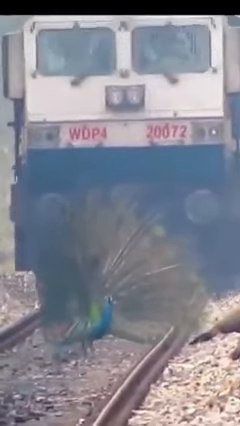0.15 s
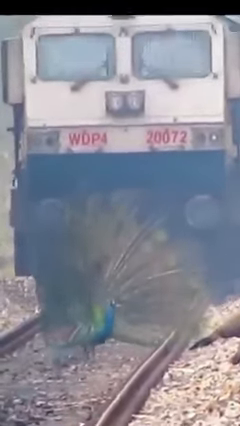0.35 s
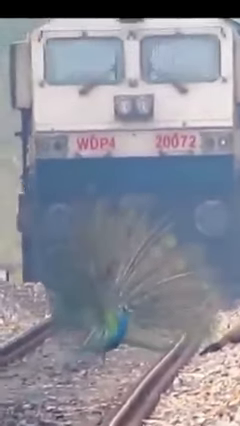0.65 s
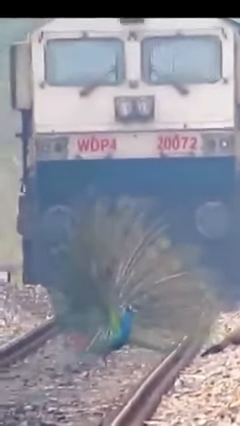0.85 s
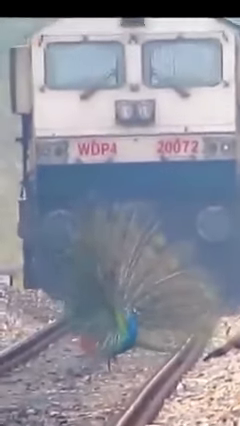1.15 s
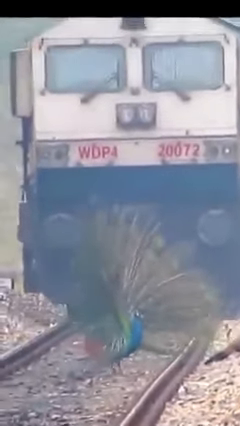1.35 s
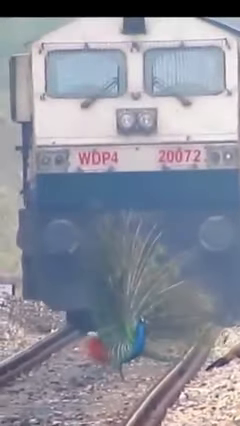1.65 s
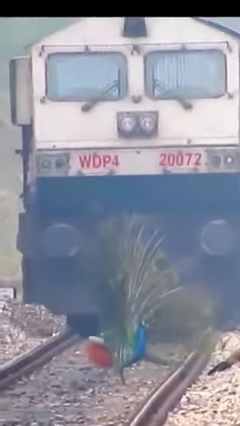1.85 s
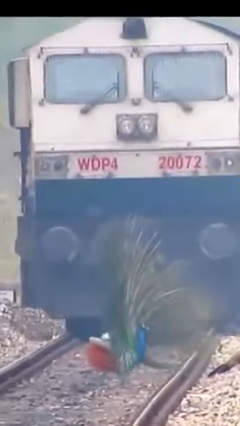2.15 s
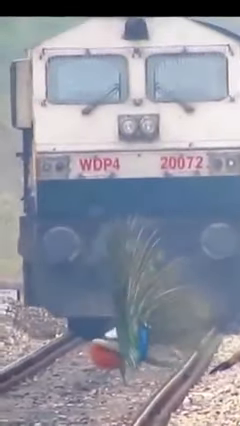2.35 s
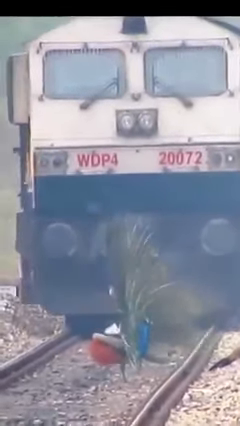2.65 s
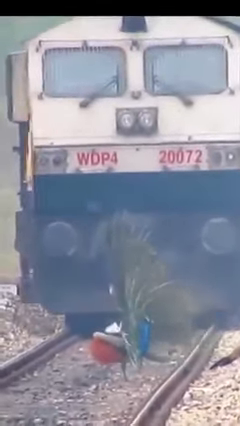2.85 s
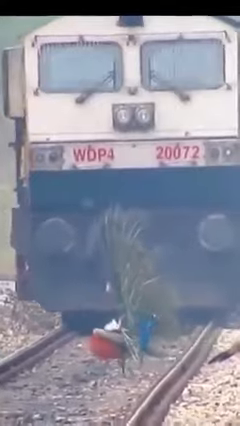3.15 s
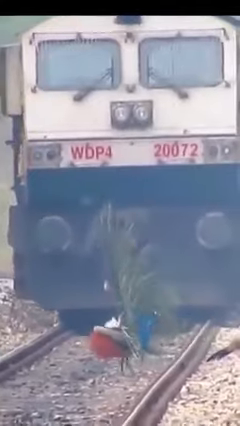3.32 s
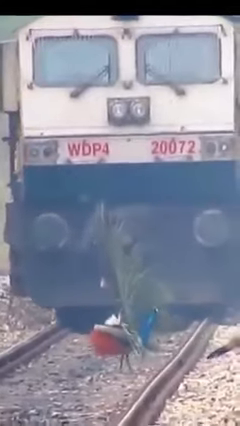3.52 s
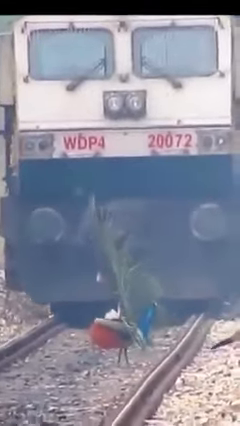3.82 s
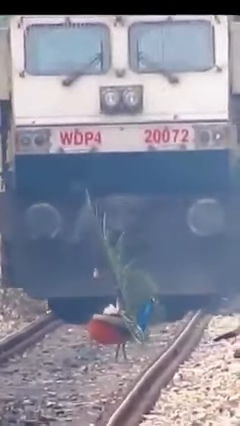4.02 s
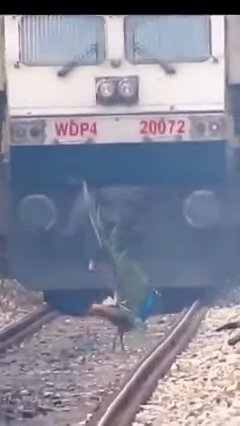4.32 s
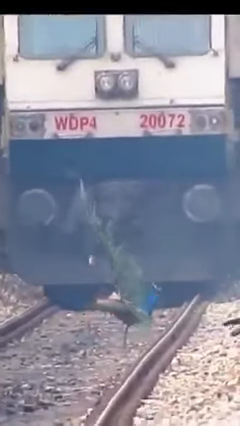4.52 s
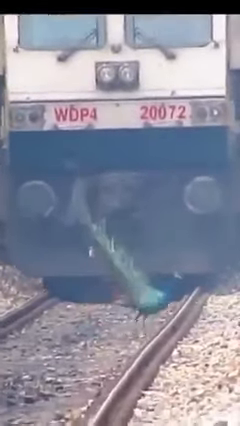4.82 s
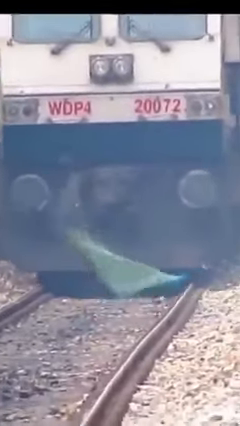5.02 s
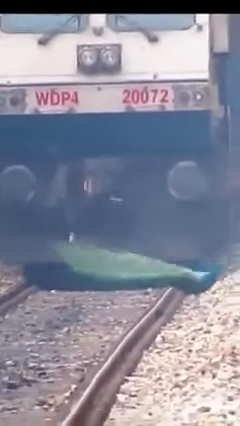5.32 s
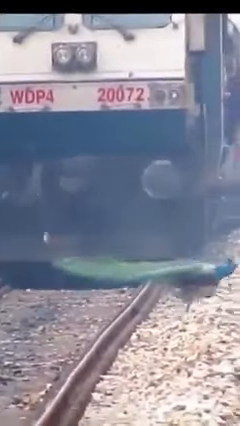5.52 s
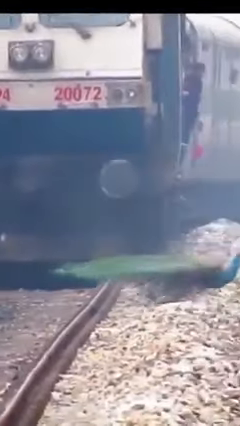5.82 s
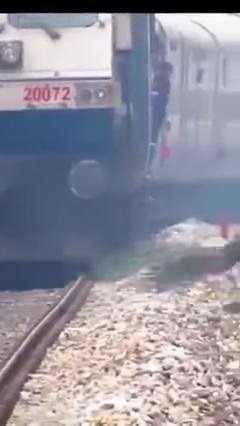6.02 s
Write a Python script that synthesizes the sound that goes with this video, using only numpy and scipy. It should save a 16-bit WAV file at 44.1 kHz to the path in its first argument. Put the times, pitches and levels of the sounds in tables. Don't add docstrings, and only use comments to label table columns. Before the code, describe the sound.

A slow diesel locomotive drones and puffs rhythmically, blows one two-note horn blast that echoes back, then its chugging and hiss grow nearer.

```python
import sys
import numpy as np
from scipy import signal
from scipy.fft import rfft, irfft
from scipy.io import wavfile

SR = 44100
rng = np.random.default_rng(int(sys.argv[2]) if len(sys.argv) > 2 else 0)


def wrap_up_sound(samples):
    columns = np.atleast_2d(samples).T
    tamed = np.clip(columns, -1, 1)
    steps = np.round(tamed * 32767).astype(np.int16)
    wavfile.write(sys.argv[1], SR, steps)


def elevation(decibels):
    levels = np.asarray(decibels, float)
    return 10 ** (levels / 20)


N = 272095
TIME = np.arange(N) / SR
HZ = np.arange(N // 2 + 1) * SR / N + 1e-3

# frequency in Hz, level in dB per Hz.
ROAR_COLOUR = [(11, -41), (18, -8.5), (32, -12.5), (68, -10.5), (108, -2), (163, 1), (371, -8.5), (428, -1),
               (522, -11), (624, -9.5), (733, -4.5), (909, -28.5), (1190, -22.5), (1300, -23.5),
               (1690, -52.5), (2860, -120)]
# multiple of shaft speed, dB above the others.
STRONG_ORDERS = [(12, 10.5), (15, 14.5), (18, 11.5), (20, -1.5), (25, -3), (30, 12.5), (36, 1), (38, 3.5),
                 (46, 2.5)]
# time in seconds, change of the drone in dB.
SURGES = [
    (.02, -1.5),
    (.705, 4.5),
    (.91, 4.5),
    (.98, -3.5),
    (3.9, 5.5),
    (3.991, -2.5),
    (4.12, 3.5),
    (4.211, -3),
    (4.29, 2.5),
]
DRONE_DB, SURGE_HALF_S = -22.5, 0.034
ROAR_DB = -34.5

# start in seconds, strong puff in dB, brightness in dB,
# second puff in dB against it.
TURNS_FAR = [(.132, -24, 2, -9.5), (.328, -23.5, -2, -8.5), (0.518, -28.5, 3, -10.5),
             (0.711, -26, -2.2, -10), (0.904, -21.5, -0.5, -9.5), (1.094, -24.5, -3, -6),
             (1.286, -25, -0.5, -9), (1.478, -23, -1, -5), (1.669, -27, -1.2, -9.5), (1.86, -27, 5.5, -9.5),
             (2.053, -26, 0.3, -12), (2.239, -26.5, 2, -11.5), (2.434, -27, -1.2, -10),
             (2.627, -25, -0.5, -12.5), (2.814, -24.5, -0.5, -5.5)]
# start in seconds, strong puff in dB, brightness in dB, second puff in dB.
TURNS_NEAR = [(3.004, -21.5, -1.5, -9), (3.193, -23.5, -1, -9), (3.38, -24, 5, -16), (3.569, -24, 3, -9),
              (3.759, -23.5, 4.5, -4), (3.946, -20.5, 4, -9.5), (4.136, -18.5, 4, -8.5),
              (4.321, -20.5, 3.5, -9), (4.51, -20, 4, -8), (4.695, -19.5, 2, -9), (4.881, -16.5, 3, -16),
              (5.068, -19.5, .6, -6), (5.253, -18.5, 1.3, -10.5), (5.438, -19.5, 1.5, -2.5),
              (5.629, -18, 3.5, -9.5), (5.817, -20.5, 2.8, -10), (6.001, -23.5, 2.2, -9)]
WEAK_PUFFS_S, THIRD_PUFF_DB = (0.0589, .127), -7.5
MIDDLE_DB, MIDDLE_FOLLOWS = -4.5, 0.83
SLAP_S, SLAP_RISE_S, SLAP_WIDTH_S, SLAP_DB = .003, .0025, .008, -1.5
RUSH_S, RUSH_WIDTH_S, RUSH_DB = .017, 0.0066, 0.5
CRACK_DB, CRACK_WIDTH_S = -6.5, 0.00056
TAIL_DB, TAIL_DB_PER_S = 1, 698
# time in seconds, change in dB.
SLAP_TURN = [
    (0, 1),
    (2.5, 2.5),
    (4.2, -2),
    (5.8, -0.5),
    (6.1, 1.5),
]
# time in seconds, level in dB.
HISS = [
    (0.0, -32.5),
    (0.91, -35),
    (1.99, -36),
    (3.33, -31.5),
    (3.64, -33),
    (3.99, -30.5),
    (4.97, -32),
    (5.64, -31),
    (6.17, -34.5),
]
# mean level in dB, share of the swing.
HISS_BANDS = [
    (-31.5, 0.29),
    (-32.5, 1.2),
    (-30.5, .95),
]
# frequency in Hz, level in dB.
HISS_TOP = [(6200, 1.1), (7000, -8.5), (7800, -13.5), (8600, -13), (9500, -31), (10500, -23), (11500, -41),
            (15000, -33.5)]

# time in seconds, pitch in Hz.
LOW_PITCH = [(.2, 314), (.25, 309), (.3, 305), (.37, 303.2), (.5, 302.8), (1.3, 302.1), (1.52, 301)]
# time in seconds, pitch in Hz.
HIGH_PITCH = [(.24, 457), (.3, 451.2), (.37, 448), (.5, 446.8), (1.3, 446.2), (1.54, 445.5)]
# level in dB, echo level in dB.
LOW_PARTIALS = [(-23.5, -29), (-18.5, -29), (-25.5, -45.5), (-26.5, -30), (-37.5, -31.5), (-33.5, -40.5),
                (-48.5, -35), (-51, -40.5), (-54.5, -39), (-50, -53.5), (-47.5, -46), (-47.5, -46.5),
                (-45, -60), (-56, -65)]
# level in dB, echo level in dB.
HIGH_PARTIALS = [(-18, -33), (-23, -33), (-27.5, -47.5), (-26, -30), (-38.5, -61.5), (-36.5, -48.5),
                 (-42.5, -52), (-49, -47.5), (-50.5, -67.5), (-58, -56.5), (-42.5, -51)]
LOW_BLOW, HIGH_BLOW = (.2, 0.072, 1.41), (0.26, 0.11, 1.401)
RELEASE_KNEE_HZ = 520
RELEASE_CYCLES, RELEASE_MIN_S = 147, 0.029
# time in seconds, frequency in Hz,
# half length in seconds, change in dB.
FADES = [(0.28, 303, 0.095, 4), (0.52, 1340, .1, 3.5), (1.25, 1786, .07, 3), (1.5, 1815, .07, 3.5),
         (.5, 2232, .15, 4), (0.51, 303, .1, -13.5), (1.09, 303, 0.037, -9.5), (0.39, 605, 0.24, -16),
         (1.3, 605, 0.2, -5.5), (0.58, 908, 0.32, -11), (0.75, 908, 0.23, -15), (1.23, 1210, 0.26, -6.5),
         (0.3, 770, .12, -14.5), (1.12, 1513, 0.099, -8.5), (2.1, 1815, .06, -6.5), (2.2, 1815, .12, 0.5),
         (0.87, 447, .06, -2.2), (.95, 447, .12, 2.4), (0.87, 447, .06, -1.5), (0.38, 893, 0.51, -1),
         (.88, 1340, 0.051, -16), (0.95, 1340, 0.38, -7), (1.1, 1786, .12, -10)]
# frequency in Hz, in-phase share and late share of the second port.
HORN_LEAN = [(300, 0.14, -0.2), (447, .93, 0.4), (600, -0.12, -0.2), (900, .1, 1.3), (1210, 0.12, -.3),
             (1340, -0.07, -2), (1480, 0.081, -1), (2600, 0.37, -0.02)]
# time in seconds, level in dB.
ECHO = [
    (.45, -15),
    (.55, -4),
    (1.45, -5),
    (1.68, -4),
    (1.74, -14.5),
    (1.95, -17),
    (2.2, -17.5),
]
ECHO_LAG_S, ECHO_PITCH = .27, 1.0172

# frequency in Hz, level in dB.
LEFT_PORT = [(300, 7), (440, 1), (600, -5), (950, -10), (1250, -1.5), (1700, 5), (2050, 0), (2650, -13.5),
             (3100, -6), (3600, -21.5), (4600, -20), (5050, -15.5), (5600, -25.5), (6300, -18.5)]
# frequency in Hz, level in dB.
RIGHT_PORT = [(300, 6.5), (440, -2), (600, -4.5), (950, -10.5), (1200, -5), (1400, -17.5), (1800, -4),
              (2300, -13), (3150, -0.5), (3800, -11), (4300, 0), (5100, -7), (5600, -11.5), (6300, -16)]
# frequency in Hz, lead in radians.
LEFT_LEAD = [(20, 0), (350, -.2), (1200, -.3), (1640, -2.5), (1850, -2.8), (2500, -5.6), (2930, -9.8),
             (3360, -12.1), (4000, -17.5), (4650, -15.1), (5080, -16.6), (7000, -16), (8500, -18.8)]
# frequency in Hz, likeness from 0 to 1.
LIKENESS = [(25, .7), (60, 0.99), (300, 0.97), (800, 0.77), (1700, 0.6), (3000, 0.7), (5000, 0.05),
            (7000, 0)]


def rms_one(x):
    return x / np.sqrt(np.mean(x ** 2) + 1e-20)


def in_time(rows, lag=0):
    s, *columns = np.transpose(rows)
    return [np.interp(TIME - lag, s, c) for c in columns]


def at_hz(points):
    hz, value = np.transpose(points)
    return np.interp(np.log(HZ), np.log(np.maximum(hz, 1)), value)


def drift(rate):
    r = np.exp(-128 * np.pi * rate / SR)
    noise = rng.standard_normal(N // 64 + 3002)
    slow = signal.lfilter([1], [1, -2 * r, r * r], noise)[3000:]
    return np.interp(np.arange(N) / 64, np.arange(len(slow)), rms_one(slow - slow.mean()))


def bump(t, middle, half):
    return np.exp(-((t - middle) / half) ** 2)


def coloured(x, gain):
    return irfft(rfft(x) * gain, N)


def engine():
    drone_db = DRONE_DB + sum(db * bump(TIME, s, SURGE_HALF_S) for s, db in SURGES)
    starts = np.transpose(TURNS_FAR + TURNS_NEAR)[0]
    turn = np.polyval(np.polyfit(starts, np.arange(len(starts)), deg=4), TIME)
    favoured, drone = dict(STRONG_ORDERS), 0
    for order in range(7, 70):
        level_db = favoured.get(order, 0) + rng.normal(0, 1.4) + 2.34 * drift(2.23)
        angle = 2 * np.pi * (order * turn + rng.random()) + 0.33 * drift(1.52)
        drone = drone + elevation(level_db) * np.sin(angle)
    colour = elevation(at_hz(ROAR_COLOUR))
    drone = elevation(drone_db - 3.0) * rms_one(coloured(drone, colour))
    noise = rng.standard_normal((2, N))
    low_roar = elevation(drone_db - 6.5) * rms_one(coloured(noise, colour * (HZ < 380)))
    high_roar = elevation(ROAR_DB + drift(4.3)) * rms_one(coloured(noise[::-1], colour * (HZ >= 380)))
    return low_roar + high_roar + drone * [[1], [.6]]


def puff_shape(after, turn_s):
    slap_db = SLAP_DB + np.interp(turn_s, *np.transpose(SLAP_TURN))
    slap = elevation(slap_db) * bump(after, SLAP_S, SLAP_WIDTH_S)
    slap = slap * np.clip(after / SLAP_RISE_S + .5, 0, 1)
    rush = elevation(RUSH_DB) * bump(after, RUSH_S, RUSH_WIDTH_S)
    rush += elevation(CRACK_DB) * bump(after, RUSH_S + .002, CRACK_WIDTH_S)
    tail = elevation(TAIL_DB - TAIL_DB_PER_S * (after - RUSH_S)) * (after > RUSH_S)
    return slap ** 2 + rush ** 2 + tail ** 2


def puffs():
    power = np.zeros((3, N))
    for s, puff_db, bright_db, weak_db in TURNS_FAR + TURNS_NEAR:
        middle_db = MIDDLE_DB + MIDDLE_FOLLOWS * bright_db
        bands_db = puff_db + np.array([-bright_db, middle_db, bright_db])
        losses_db = (0, weak_db, weak_db + THIRD_PUFF_DB)
        for lag, loss_db in zip((0, *WEAK_PUFFS_S), losses_db):
            near = slice(int((s + lag - .01) * SR), int((s + lag + .08) * SR))
            shape = elevation(2 * loss_db) * puff_shape(TIME[near] - s - lag, s)
            blunted = shape ** [[.75], [.9], [1]]
            power[:, near] += elevation(2 * bands_db)[:, None] * blunted
    return power


def compressor(grit_db, patchy_db):
    exposed_db, power = in_time(HISS)[0], puffs()
    swing_db = exposed_db - exposed_db.mean()
    hiss = elevation(2 * np.array([db + share * swing_db for db, share in HISS_BANDS]))
    level = np.sqrt(power * elevation(2 * np.array([[.1], [4], [.1]])) + hiss)
    thump = np.sqrt(power[0]) * elevation(-3.5)
    grit = elevation(grit_db * drift(450))
    air, out = rfft(rng.standard_normal((2, N)) * grit), 0
    edges = 380 * 2 ** np.arange(0, 5.5, 1 / 3)
    for lower, upper in zip(edges, edges[1:]):
        band = irfft(air * ((HZ >= lower) & (HZ < upper)), N)
        gain = thump if upper < 800 else level[np.searchsorted((2450, 3850), upper)]
        flicker = elevation(patchy_db * (drift(14.0) + 0.39 * drift(3.3)))
        out = out + band * gain * flicker
    colour_db = (at_hz(LEFT_PORT) + at_hz(RIGHT_PORT)) / 2 + at_hz(HISS_TOP)
    low_cut = np.clip(HZ / 800, 0, 1)
    return elevation(14) * coloured(out, elevation(colour_db) * low_cut)


def horn_pipe(pitch, blow, partials):
    start, attack, shut = blow
    lean_hz, louder_share, later_share = np.transpose(HORN_LEAN)
    phase = 2 * np.pi * np.cumsum(in_time(pitch)[0]) / SR
    opened = np.clip((TIME - start) / attack, 0, 1)
    out = np.zeros((2, N))
    for k, (level_db, _) in enumerate(partials):
        hz = (k + 1) * pitch[-2][1]
        ring_s = RELEASE_MIN_S + RELEASE_CYCLES / max(hz, RELEASE_KNEE_HZ)
        release_db = -60 * np.maximum(TIME - shut, 0) / ring_s
        fade_db = sum(db * bump(TIME, s, half) for s, at, half, db in FADES if abs(at / hz - 1) < .008)
        waver_db = .36 * drift(25) + .3 * drift(3)
        gain = opened ** (1 + 0.18 * k) * elevation(3.5 + level_db + release_db + fade_db + waver_db)
        angle = (k + 1) * phase + 0.49 * rng.normal()
        louder = np.interp(hz, lean_hz, louder_share)
        later = np.interp(hz, lean_hz, later_share)
        out += gain * np.array([np.cos(angle), louder * np.cos(angle) + later * np.sin(angle)])
    return out


def tree_echo(pitch, partials):
    phase = 2 * np.pi * np.cumsum(in_time(pitch, ECHO_LAG_S)[0] * ECHO_PITCH) / SR
    echo = elevation(in_time(ECHO)[0]) * (TIME > ECHO[0][0]) * (TIME < ECHO[-1][0])
    out = np.zeros((2, N))
    for k, (_, echo_db) in enumerate(partials):
        for side in out:
            flutter = elevation(4.0 + echo_db + 2.3 * drift(15))
            wander = (k + 2) * (0.25 * drift(8.7) + .07 * drift(40))
            side += echo * flutter * np.sin((k + 1) * phase + 7 * rng.random() + wander)
    return out


def ports(shared, scattered):
    alike = np.clip(at_hz(LIKENESS), 0, 1)
    tilt_db = (at_hz(LEFT_PORT) - at_hz(RIGHT_PORT)) / 2 * np.clip(HZ / 300, 0, 1) ** 2
    tilt = elevation(tilt_db) * np.exp(.5j * at_hz(LEFT_LEAD))
    one = rfft(shared) * np.sqrt((1 + alike) / 2)
    other = rfft(scattered) * np.sqrt((1 - alike) / 2)
    return irfft(np.array([(one + other) * tilt, (one - other) / tilt]), N)


def scene():
    machine = engine() + compressor(grit_db=0.38, patchy_db=2.0)
    horn = horn_pipe(LOW_PITCH, LOW_BLOW, LOW_PARTIALS) + horn_pipe(HIGH_PITCH, HIGH_BLOW, HIGH_PARTIALS)
    echo = tree_echo(LOW_PITCH, LOW_PARTIALS) + tree_echo(HIGH_PITCH, HIGH_PARTIALS)
    return ports(*(machine + horn + echo))


def top_cut(x):
    return signal.sosfilt(signal.butter(12, 15160, fs=SR, output="sos"), x)


def record(dry):
    x = 1.4 * np.tanh((dry + .035 * dry ** 2) / 1.4)
    x = signal.sosfilt(signal.butter(2, 8000, fs=SR, output="sos"), x - x.mean())
    thin_hiss = coloured(rng.standard_normal((2, N)), (HZ > 11900) & (HZ < 13300))
    x += elevation(-87.0) * rms_one(thin_hiss)
    return top_cut(x)


dry = scene()
out = record(dry)
wrap_up_sound(out)
```